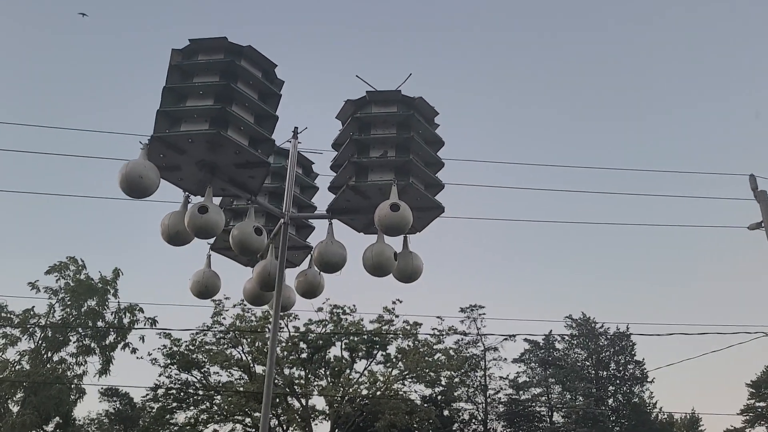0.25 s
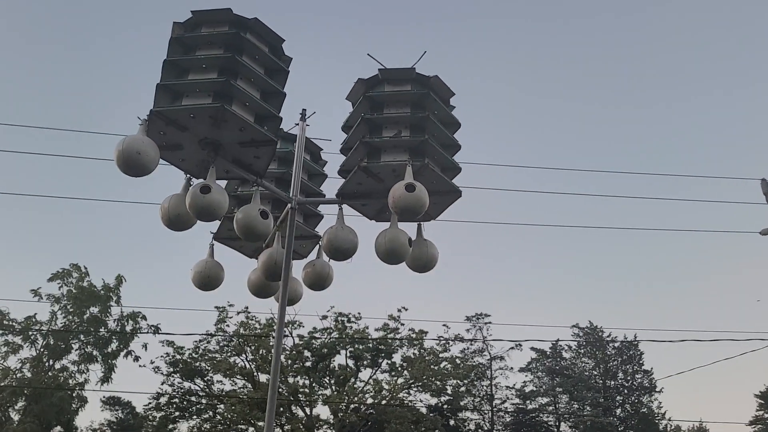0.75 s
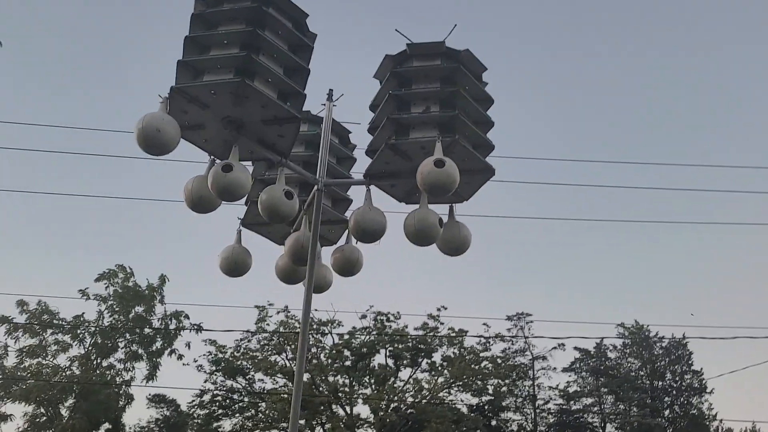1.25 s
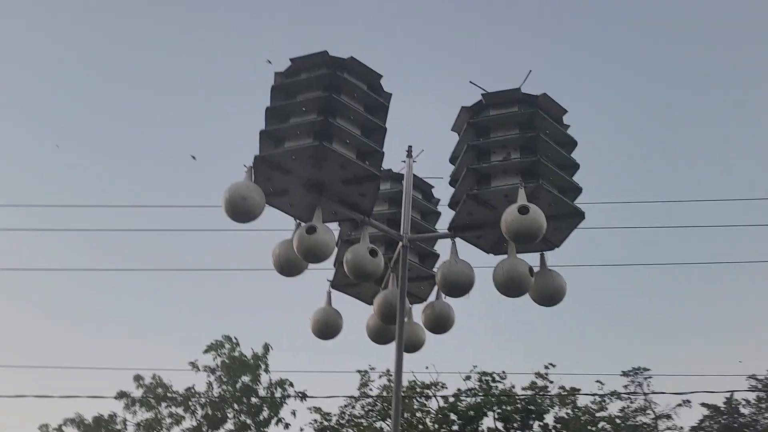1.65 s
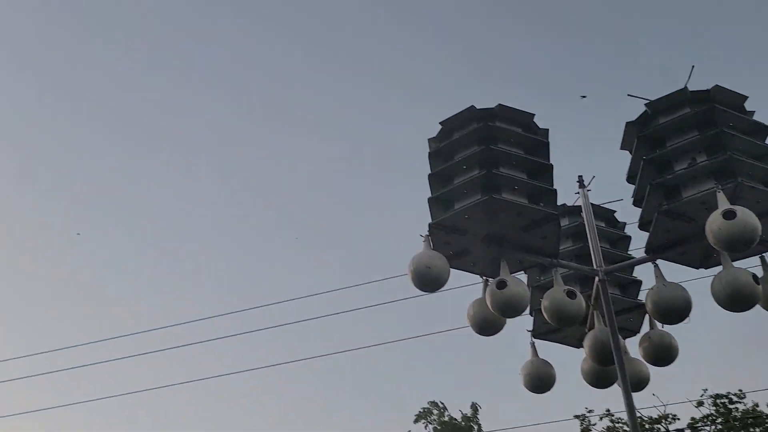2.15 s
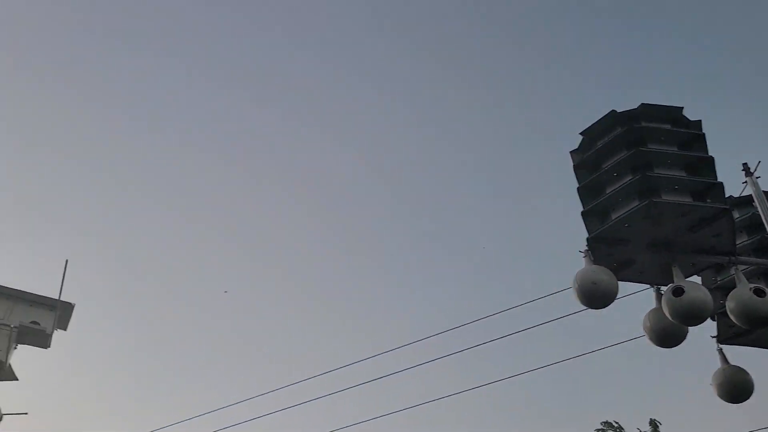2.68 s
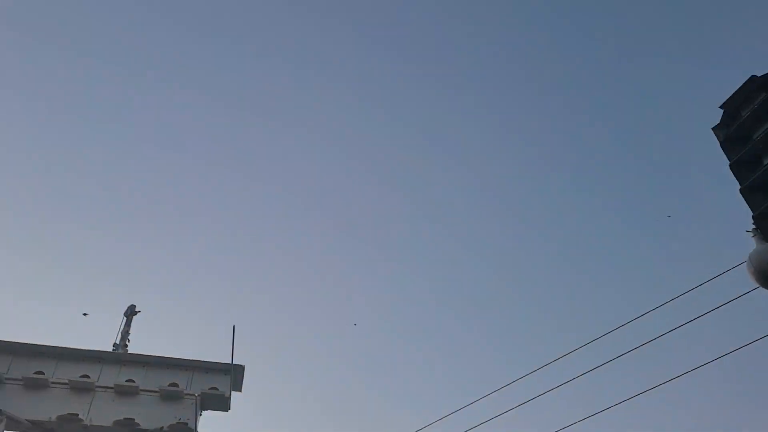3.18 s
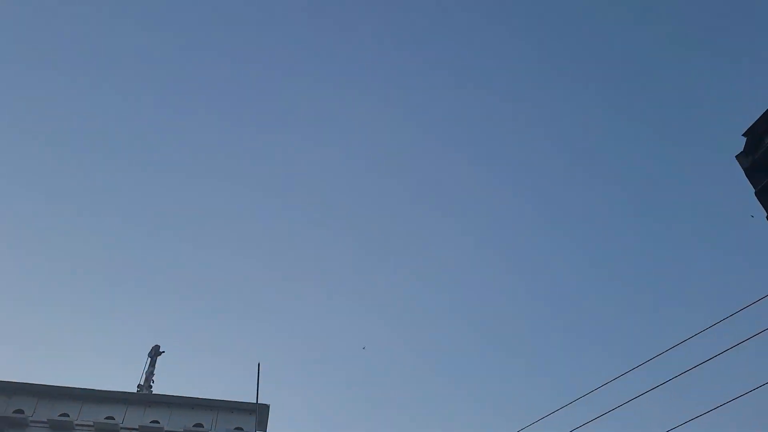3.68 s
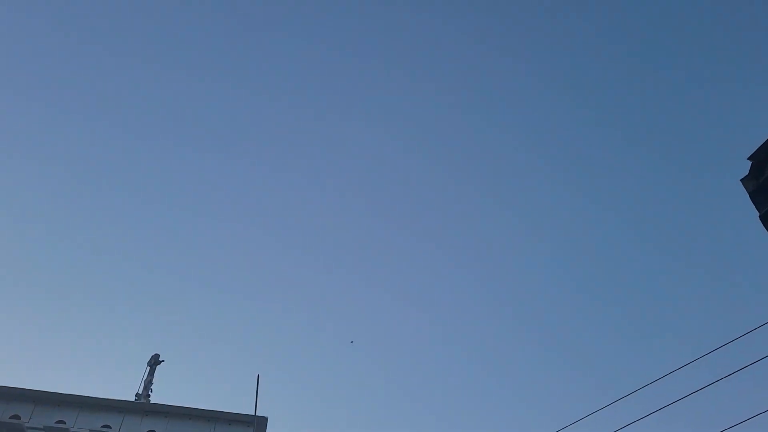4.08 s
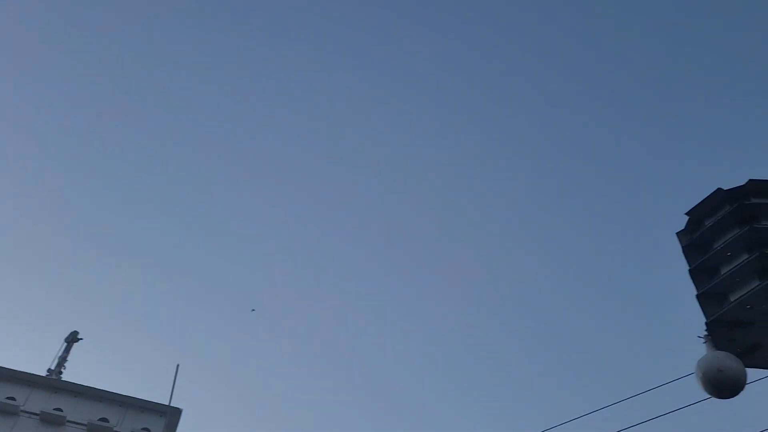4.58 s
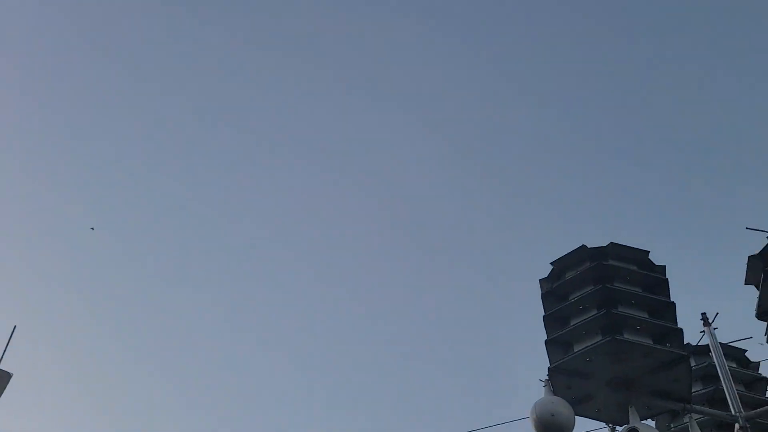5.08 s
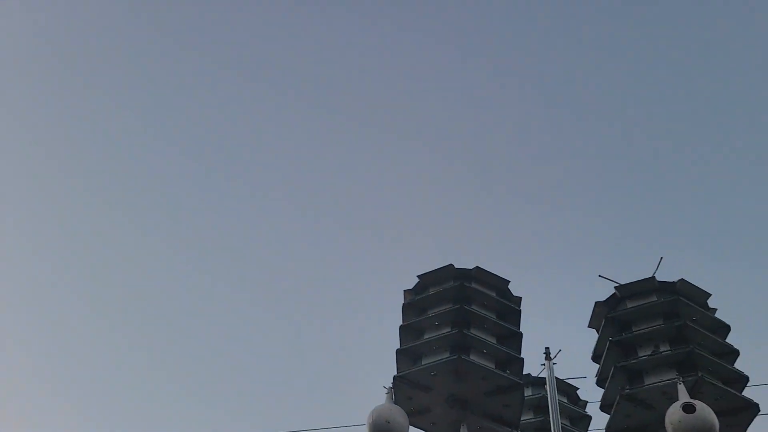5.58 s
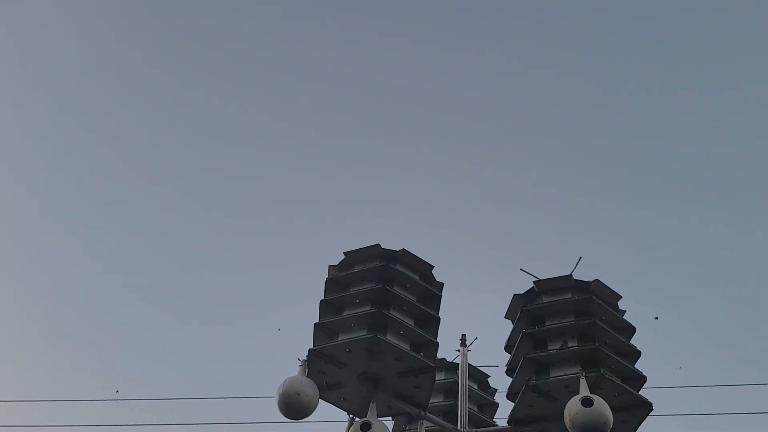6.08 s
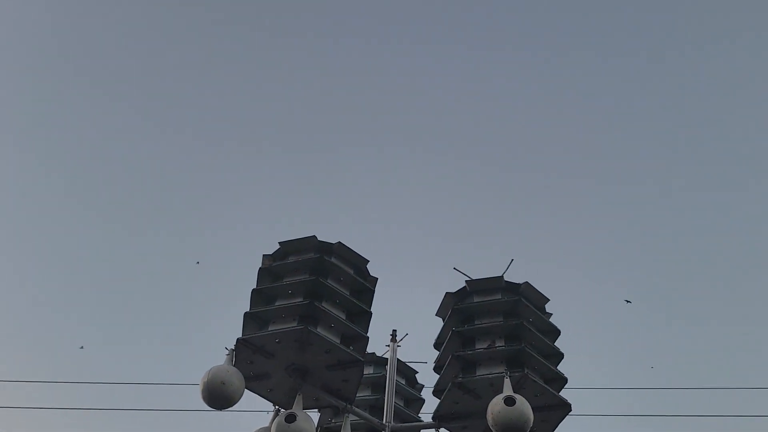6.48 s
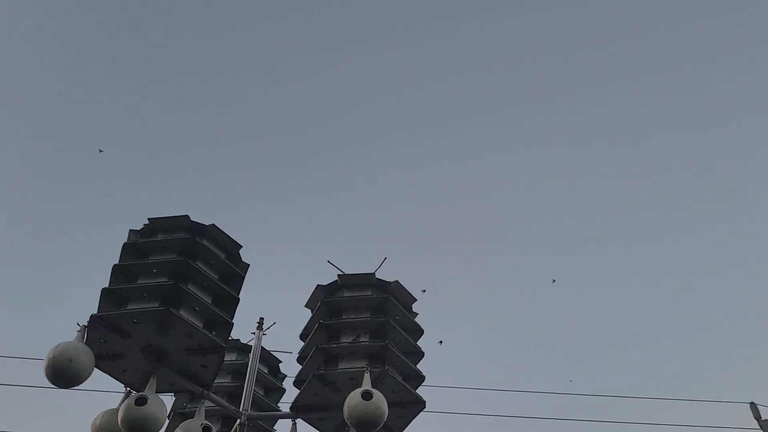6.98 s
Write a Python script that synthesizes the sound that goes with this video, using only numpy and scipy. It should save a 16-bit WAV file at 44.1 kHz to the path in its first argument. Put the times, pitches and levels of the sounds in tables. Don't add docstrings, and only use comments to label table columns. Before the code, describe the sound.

Martins wheel around outdoor nest houses, giving buzzy falling calls and clean tiny chirps, with quiet road noise, brief hum and a few handling creaks.

```python
import sys
import numpy as np
from scipy import signal
from scipy.fft import rfft, irfft, next_fast_len
from scipy.io import wavfile
from scipy.ndimage import uniform_filter1d, map_coordinates

SR = 44100
rng = np.random.default_rng(int(sys.argv[2]) if len(sys.argv) > 2 else 0)


def invert_db(x):
    u = np.asarray(x, float) / 20
    return 10 ** u


def transcribe(u):
    v = np.clip(np.atleast_2d(u).T, -1, 1)
    q = np.round(v * 32767).astype(np.int16)
    wavfile.write(sys.argv[1], SR, q)


N = 319725
T_S = np.arange(N) / SR

# frequency in Hz, density in dB per Hz.
WIND_SPECTRUM = [(15, -22), (30, -19), (55, -4), (90, -9), (160, -23), (400, -40.5), (800, -120)]
# time in seconds, level in dB.
GUSTS = [(0.0, -53.5), (.6, -62.5), (1.23, -63), (1.8, -56), (2.4, -58.5), (3.0, -54), (3.6, -61),
         (4.1, -59), (4.6, -56), (5.2, -55), (5.9, -54.5), (6.64, -57.5), (7.25, -69.5)]
# centre in seconds, half length in seconds, rise in dB.
BUMPS = [
    (0.378, 0.047, 11.5),
    (2.482, 0.043, 11),
    (3.544, 0.11, 10),
    (4.594, 0.051, 11.5),
    (5.454, 0.16, 10.5),
    (5.676, 0.022, 15.5),
    (6.743, 0.055, 8.5),
]
# frequency in Hz, density in dB per Hz.
ROAD_SPECTRUM = [(40, -14), (100, -6.5), (250, -8), (500, -14.5), (900, -18), (1500, -25.5), (3000, -56)]
# time in seconds, road level in dB.
TRAFFIC = [(0, -59), (.12, -61), (.5, -65), (1.2, -64), (2.05, -65), (2.4, -64), (2.8, -63.5), (3.5, -70),
           (3.95, -67), (4.3, -66), (4.7, -70.5), (5.3, -70), (5.8, -75), (6.4, -71), (6.78, -68),
           (6.9, -77.5), (7.08, -86.5), (7.25, -85)]
# frequency in Hz, density in dB per Hz.
TYRE_SPECTRUM = [(500, -26), (900, -11), (1200, -3.5), (1600, -5), (2100, -9), (3100, -4), (3900, -22),
                 (8000, -36), (16000, -50)]
TYRES_DB, TYRES_GROW, ROAD_MEAN_DB = -66.5, 1.13, -64
# frequency in Hz, density in dB per Hz.
CAR_SPECTRUM = [(80, 1), (250, 6), (600, -9), (1200, -3), (1900, -9), (2400, -41.5), (4000, -66.5)]
CAR_S, CAR_RISE_S, CAR_DB = 7.09, 0.08, -61.5
# frequency in Hz, density in dB per Hz.
INSECT_SPECTRUM = [(4900, -84), (5350, -13), (5800, -6.5), (6200, -12), (6800, -25.5)]
INSECT_DB = -79
# time in seconds, second harmonic in dB, fourth harmonic in dB.
HUM = [(0.0, -48, -53.5), (0.56, -65.5, -64.5), (7.25, -70, -69.5)]
# frequency in Hz, left-right likeness from 0 to 1.
ALIKE = [(60, .35), (130, .85), (300, .85), (600, .5), (3000, .4), (15000, .3)]
# time in seconds, peak in dB, crack in dB re peak, left-right difference in dB.
CREAKS = [
    (1.159, -49, -30, 1.5),
    (2.233, -44, -30, -1),
    (2.798, -50, -35, 3),
    (4.202, -49, -8, .5),
    (4.375, -38, -16, -11),
    (4.391, -50, -24, -11),
    (4.417, -52, -30, -10),
    (7.215, -58, -20, 0),
]
# start in seconds, length in seconds, level in dB, centre in Hz.
RUBS = [
    (-.02, 0.06, -63.5, 15130),
    (4.36, 0.064, -58.5, 7700),
    (4.754, 0.067, -69.5, 7600),
]
# centre in Hz, width in Hz, gain in dB.
CASE = [(294, 400, 12.5), (630, 73, 16), (1070, 190, 15)]
# frequency in Hz, decay by 60 dB in seconds.
TREE_DECAY = [(1000, 0.18), (3000, 0.63), (6000, 0.53), (15000, 0.52)]
# start in seconds, length in seconds, start in Hz, end in Hz, level in dB.
CHIRPS_AHEAD = [(.162, .033, 3600, 2950, -53), (.34, .035, 3350, 2000, -54), (.372, .07, 2000, 1800, -61),
                (.352, .034, 5600, 3600, -66), (.405, .03, 4300, 3600, -75), (1.17, .025, 4000, 3400, -63),
                (.39, .03, 3550, 2950, -58), (.852, .035, 3650, 2850, -50), (.885, .022, 3400, 3000, -53),
                (.985, .032, 4150, 3400, -59), (1.02, .035, 2600, 2100, -61),
                (1.082, .032, 3700, 3000, -50), (1.13, .015, 4400, 4000, -62),
                (1.515, .035, 3600, 2900, -49), (1.55, .025, 3400, 2800, -50), (1.89, .19, 6600, 6150, -69),
                (2.08, .03, 4900, 3800, -64), (3.76, .015, 3700, 3500, -63), (6.315, .04, 4300, 3000, -69),
                (6.44, .03, 6300, 4200, -65), (6.44, .04, 2500, 1900, -68), (1.435, .025, 3300, 2900, -57),
                (2.9, .06, 2600, 2450, -59), (6.75, .035, 5500, 5150, -63)]
# start in seconds, length in seconds, start in Hz, end in Hz, level in dB.
CHIRPS_LEFT = [(.2, .03, 3350, 2750, -56), (.23, .02, 3300, 2800, -63), (.92, .03, 2750, 2400, -63),
               (1.022, .03, 4800, 3200, -59), (1.045, .035, 3200, 2550, -58),
               (1.108, .033, 2900, 1900, -57), (1.14, .025, 2900, 2500, -57), (1.7, .015, 3650, 3500, -51),
               (2.11, .055, 4750, 3750, -64), (2.165, .125, 3750, 4750, -64)]
AHEAD_PAN_DB, LEFT_PAN_DB = 1.2, 7.5
# start in seconds, length in seconds, start in Hz, end in Hz, level in dB.
UNDERTONES = [(1.17, 0.082, 2500, 2460, -56), (1.694, 0.19, 2400, 2170, -59.5),
              (1.928, .11, 2320, 2194, -57), (2.372, 0.082, 2320, 2340, -64),
              (2.736, 0.12, 2310, 2150, -53.5), (3.04, 0.086, 2200, 2250, -59.5),
              (3.113, .11, 5440, 5180, -68.5), (3.042, 0.13, 4240, 4090, -68.5),
              (2.06, 0.089, 8100, 7530, -71.5), (6.724, 0.071, 5650, 4870, -64.5),
              (2.3, 0.074, 3050, 3160, -68), (4.1, 0.12, 2460, 2060, -62), (4.333, 0.092, 2260, 2100, -60),
              (5.498, 0.033, 7600, 7900, -64.5), (5.824, 0.12, 2850, 2350, -58),
              (5.864, 0.054, 7800, 8000, -63), (5.871, 0.055, 1570, 1630, -75),
              (6.47, .12, 2210, 1953, -58), (6.637, 0.12, 2310, 2070, -59.5),
              (6.76, 0.067, 1160, 1364, -66.5)]
FUZZ_HZ, UNDERTONE_PAN_DB = 455.6, 8

# start in seconds, length in seconds, peak in dB, top pitch in Hz, end pitch in Hz.
CLEAR = [
    (1.567, 0.15, -50.5, 3080, 2556),
    (3.784, 0.19, -46, 3293, 2550),
    (4.455, 0.18, -40.5, 3310, 2630),
    (4.858, 0.215, -37, 3379, 2697),
    (5.18, 0.21, -37.5, 3348, 2554),
]
BURRY = [
    (1.412, 0.08, -57.5, 3120, 2910),
    (2.15, 0.11, -36, 3224, 2830),
    (2.627, 0.15, -53.5, 3247, 3230),
    (3.36, 0.19, -44, 3307, 2873),
    (6.068, 0.13, -51.5, 3125, 2050),
    (5.405, 0.05, -61.5, 3130, 3120),
]
HOARSE_RIGHT = [
    (1.698, 0.2, -45, 3330, 2535),
    (2.02, 0.16, -45, 3254, 2430),
    (2.365, .225, -40, 3455, 2200),
    (3.002, 0.28, -37.5, 3450, 2422),
    (4.28, 0.165, -40, 3313, 2512),
]
HOARSE_LEFT = [
    (.688, 0.155, -38.5, 3270, 2080),
    (1.862, .16, -41, 3256, 2400),
    (4.063, .1, -43, 3490, 3000),
    (5.776, 0.175, -38, 3500, 2450),
]
SLURS = [
    (1.178, .205, -41, 3580, 2400),
    (2.268, 0.068, -50, 3150, 2750),
    (5.908, .175, -35, 3290, 2520),
]
RASPY = [
    (-.03, 0.08, -56.5, 3264, 2680),
    (-.03, 0.072, -52, 2438, 2140),
]
NEAR = [
    (6.355, 0.125, -50, 3240, 2780),
]
ROUGH = [
    (6.465, .15, -43.5, 3090, 2607),
]
LEVEL = [
    (4.133, 0.18, -40.5, 3230, 2630),
    (5.499, .215, -38, 3293, 2583),
]
STEEP = [
    (2.733, .165, -38, 3397, 2247),
]
DENSE = [
    (.485, .125, -46, 3380, 2700),
    (.555, .115, -45, 3480, 2200),
]
HARSH = [
    (6.612, .215, -38, 3270, 2400),
]
THICK = [
    (3.521, .175, -38, 3357, 2497),
]
FLOCK = (CLEAR, BURRY, HOARSE_RIGHT, HOARSE_LEFT, SLURS, RASPY, NEAR, ROUGH, LEVEL, STEEP, DENSE, HARSH, THICK)
# burr rate in Hz, pitch swing as share of pitch, rasp in dB.
VOICES = [(180, .021, -29), (180, .025, -24), (115, .032, -17), (135, .03, -21), (150, .027, -21),
          (198, .035, -8), (194, .024, -22), (170, .03, -13), (180, .022, -25), (170, .024, -22),
          (150, .033, -13), (194, .026, -15), (130, .035, -11)]
# second, third, fourth and fifth partial in dB, spray in dB, breath in dB.
OVERTONES = [(-23.5, -34.5, -34, -41, -32, -37), (-25, -36, -48.5, -33.5, -28.5, -39),
             (-25, -31, -47.5, -42.5, -20.5, -35.5), (-21.5, -33.5, -61, -38.5, -26, -36.5),
             (-25.5, -43, -33.5, -41.5, -23.5, -34.5), (-16, -22, -30, -18, 0, -25),
             (-13.5, -41, -47, -40, -21, -31), (-15.5, -41, -39, -26.5, -14.5, -30),
             (-21, -35, -32.5, -43.5, -29.5, -37), (-24, -40, -51, -43, -18.5, -32.5),
             (-23.5, -31, -44, -40, -18.5, -35), (-13, -46, -36.5, -36, -15.5, -28.5),
             (-18.5, -41, -45, -32, -18.5, -31)]
# share of the call at top pitch, rise to it as share of pitch, power of the pitch fall,
# share of the call at peak level, swell in dB, dying in dB.
ARCHES = [(.33, 0.099, 1.8, 0.62, 10.5, 5), (.3, .07, 1.6, 0.56, 6.5, 0), (.25, 0.06, 1.35, 0.49, 12, 9.5),
          (0.25, 0.068, 1.6, 0.45, 15.5, 18), (0.17, .03, 1.2, 0.22, 9.5, 11),
          (0.11, 0.01, 1.1, 0.18, -10.5, 33), (.45, 0.17, 1.2, 0.71, 11.5, -1.5),
          (0.33, 0.039, 1, 0.46, 9, 8), (.3, 0.068, 2.1, 0.73, 6.5, 6.5), (.25, 0.058, 1.25, 0.41, 12, 7.5),
          (0.17, .02, 1.3, 0.54, 6.5, 9.5), (0.45, 0.23, 0.86, 0.7, 10.5, 8.5),
          (.25, .04, 1.9, 0.42, 7.5, 15.5)]
# time in seconds, left-right difference in dB, left lag in ms.
PATHS = [
    [(1.6, 4.5, -0.37), (3.8, 8, -.45), (4.46, 9.5, -.4), (4.85, 11.5, -0.41), (5.18, 11.5, -0.33)],
    [(1.4, 8, -0.34), (2.15, 7, 0.29), (2.63, 0, 0.06), (3.36, 5.5, -0.41), (5.4, -2, -0.43),
     (6.07, -3, -0.12)],
    [(1.7, 0, 0.32), (2.02, 7, .2), (2.36, 5, .16), (3.0, 4, .14), (4.3, 10, 0.54)],
    [(.7, 8.5, -0.09), (1.9, 7.5, -.3), (4.1, 9, -0.54), (5.8, 5, -0.39)],
    [(1.2, -3, 0.39), (2.3, 11, -0.35), (5.9, 6.5, -0.39)],
    [(0.0, 0, -.05)],
    [(6.36, 7, -0.05)],
    [(6.47, 9.5, -.6)],
    [(4.15, 3.5, -.43), (5.5, 6.5, -.4)],
    [(2.74, 3, .05)],
    [(.49, 8.5, .43), (.55, 0, .45)],
    [(6.62, 3, -0.26)],
    [(3.5, -1, -.4)],
]
# multiple of pitch, spread in Hz, level in dB.
SIDEBANDS = [(0.72, 600, -9), (.9, 900, 5.5)]
# frequency in Hz, gain in dB.
THROAT = [(1200, -14), (2100, -2), (3000, 0.5), (3650, 2), (4050, -3), (5000, -4), (6300, -3), (16000, 3)]
SWELL_BEND = 1.74
LOW_FADE_DB, FOURTH_LATE_DB = 13, 20
SPRAY_MULTIPLE, SPRAY_HZ = 1.2, 2200
ATTACK_S, RELEASE_S, FLUTTER_DB = .016, .016, 1.2
TOP_HZ = 15780


def unit(x):
    return x / np.sqrt(np.mean(x ** 2) + 1e-20)


def along(points, hz):
    f, v = np.transpose(points)
    return np.interp(np.log(hz + 1), np.log(f + 1), v)


def curves(rows, t):
    s, *cols = np.transpose(rows)
    return [np.interp(t, s, c) for c in cols]


def wobble(rate_hz, size=N):
    knots = rng.standard_normal(int(size * rate_hz / SR) + 4)
    return map_coordinates(knots, [np.arange(size) * rate_hz / SR])


def filtered(x, response):
    m = next_fast_len(N + SR // 2)
    return irfft(rfft(x, m) * response(np.fft.rfftfreq(m, 1 / SR)), m)[..., :N]


def fade(t, rise_s, fall_s):
    return np.clip((t - t[0]) / rise_s, 0, 1) * np.clip((t[-1] - t) / fall_s, 0, 1)


def sine(hz):
    return np.sin(2 * np.pi * np.cumsum(hz) / SR)


def add(out, x, s, pan_db, lag_ms):
    for port, sign in enumerate((1, -1)):
        at = max(round((s + sign * lag_ms / 2000) * SR), 0)
        out[port, at:at + len(x)] += invert_db(sign * pan_db / 2) * x


def rush(spectrum, patchy_db):
    z = signal.stft(rng.standard_normal((2, N)), nperseg=512)[2]
    field = uniform_filter1d(rng.standard_normal(z.shape[1:]), 6, 0)
    field = uniform_filter1d(field, 14, 1)
    pair = signal.istft(z * invert_db(patchy_db * unit(field)), nperseg=512)[1][:, :N]

    def mid_side(hz):
        turn = np.arccos(np.clip(along(ALIKE, hz), -1, 1)) / 2
        return invert_db(along(spectrum, hz)) * [np.cos(turn), np.sin(turn)]

    mid, side = filtered(pair, mid_side)
    return unit(np.array([np.roll(mid + side, -17), mid - side]))


def road():
    level_db, = curves(TRAFFIC, T_S)
    level_db = level_db + 6 + 2 * wobble(8.3)
    return invert_db(level_db + [[-.8], [.8]]) * rush(ROAD_SPECTRUM, patchy_db=1.5)


def tyres():
    road_db, = curves(TRAFFIC, T_S)
    level_db = TYRES_DB + TYRES_GROW * (road_db - ROAD_MEAN_DB)
    return invert_db(level_db + 6 + 2.05 * wobble(12)) * rush(TYRE_SPECTRUM, patchy_db=1.8)


def car():
    return invert_db(CAR_DB) * np.clip((T_S - CAR_S) / CAR_RISE_S, 0, 1) * rush(CAR_SPECTRUM, patchy_db=0)


def insects():
    level_db = INSECT_DB + 1.5 * wobble(3) + 1.2 * wobble(30)
    return invert_db(level_db) * rush(INSECT_SPECTRUM, patchy_db=2)


def hum():
    second_db, fourth_db = curves(HUM, T_S)
    mains = 2 * np.pi * 119.8 * T_S
    second = invert_db(second_db + 2.8 * wobble(8.6)) * np.sin(mains + 1.7 * wobble(7.4))
    fourth = invert_db(fourth_db - 2.5 + 4.6 * wobble(12)) * np.sin(2 * mains + 2.63 * wobble(11))
    return second + fourth


def wind():
    level_db, = curves(GUSTS, T_S)
    for s, half_s, rise_db in BUMPS:
        level_db = level_db + rise_db * np.exp(-((T_S - s) / half_s) ** 2)
    lumps = unit(invert_db(2.5 * wobble(6)) * rush(WIND_SPECTRUM, patchy_db=1.5))
    return invert_db(level_db + [[-3], [3]]) * lumps


def case(hz):
    response = 0
    for k, (centre_hz, width_hz, db) in enumerate(CASE):
        damping = 1j * hz * width_hz
        response = response + (-1) ** k * invert_db(db - 29) * damping / (centre_hz ** 2 - hz ** 2 + damping)
    return response


def creaks():
    knocks, cracks = np.zeros((2, N + SR)), np.zeros((2, N + SR))
    t = np.arange(SR // 50) / SR
    for s, db, crack_db, pan_db in CREAKS:
        knock = np.sin(np.pi * np.clip(t / 0.00075, 0, 1))
        add(knocks, invert_db(db + 26) * knock, s, pan_db, .3)
        crack = np.diff(rng.standard_normal(len(t) + 1))
        add(cracks, invert_db(db + crack_db - 60 * t / .012) * crack, s, pan_db, 0)
    return cracks[:, :N] + filtered(knocks[:, :N], case)


def rubs():
    out = np.zeros((2, N))
    for s, length_s, db, hz in RUBS:
        half_s = length_s / 2
        stroke = np.exp(-((T_S - s - half_s) / half_s) ** 4) * invert_db(3 * wobble(200))
        spectrum = [(hz / 3, -18), (hz * .85, -4), (hz, 0), (hz * 1.2, -6), (hz * 2, -12)]
        out += invert_db(db) * stroke * rush(spectrum, patchy_db=2)
    return out


def yard(x):
    t = np.arange(SR // 8) / SR
    near = rng.standard_normal((2, len(t))) * invert_db(-60 * t / .07) * (t > .002)
    near = invert_db(-4.5) * near / np.linalg.norm(near[0])
    hz, t, z = signal.stft(rng.standard_normal((2, SR)), SR, nperseg=256)
    decay = invert_db(-60 * t / along(TREE_DECAY, hz)[:, None])
    tail = signal.istft(z * decay, SR, nperseg=256)[1]
    far = invert_db(-17) * np.pad(tail / np.linalg.norm(tail[0]), ((0, 0), (1200, 0)))
    around = x.mean(axis=0) + x / 2
    scatter = signal.fftconvolve(around, near, axes=1)[:, :N]
    return x + scatter + signal.fftconvolve(around, far, axes=1)[:, :N]


def chirps():
    out = np.zeros((2, N + SR))
    for rows, pan_db in ((CHIRPS_AHEAD, AHEAD_PAN_DB), (CHIRPS_LEFT, LEFT_PAN_DB)):
        for s, length_s, start_hz, end_hz, db in rows:
            t = np.arange(0, length_s + .003, 1 / SR)
            hz = start_hz + (end_hz - start_hz) * (t / length_s) ** .9 + 25 * wobble(200, len(t))
            slide = sine(hz) * invert_db(2 * wobble(120, len(t)))
            add(out, invert_db(db) * fade(t, .006, .011) * slide, s, pan_db, -.04 * pan_db)
    return out[:, :N]


def undertones():
    out = np.zeros((2, N + SR))
    for s, length_s, start_hz, end_hz, db in UNDERTONES:
        t = np.arange(0, length_s, 1 / SR)
        note = wobble(FUZZ_HZ, len(t)) * sine(np.linspace(start_hz, end_hz, len(t)))
        add(out, invert_db(db + 4) * fade(t, .015, .015) * note, s, UNDERTONE_PAN_DB, .2)
    return out[:, :N]


def arch(u, top, before, after, bend):
    early = np.clip(1 - u / top, 0, 1) ** 2
    late = np.clip((u - top) / (1 - top), 0, 1) ** bend
    return -before * early - after * late


def call(out, row, voice, upper, shape, path):
    s, length_s, peak_db, top_hz, end_hz = row
    burr_hz, swing, rasp_db = voice
    second_db, third_db, fourth_db, fifth_db, spray_db, breath_db = upper
    top, rise, sag_bend, peak, swell_db, dying_db = shape
    t = np.arange(s + 0.00085, s + length_s + 0.00557, 1 / SR)

    def chance(rate_hz):
        return wobble(rate_hz, len(t))

    strain = np.linspace(0, 1, len(t))
    hz = top_hz + arch(strain, top, rise * top_hz, top_hz - end_hz, sag_bend)
    hz = uniform_filter1d(hz, 600)
    level_db = peak_db + arch(strain, peak, swell_db, dying_db, SWELL_BEND)

    burr = 2 * np.pi * np.cumsum(burr_hz * (1 + .22 * chance(60))) / SR
    depth = np.clip(60 * swing - 1, .15, .75)
    pulses = (1 + depth * np.cos(burr)) / np.sqrt(1 + depth ** 2 / 2)
    pulses = pulses * invert_db(FLUTTER_DB * chance(35.5))
    bend = swing * (.75 + .55 * strain) * (1.1 * np.sin(burr) + 22 * swing * chance(400))
    phase = 2 * np.pi * np.cumsum(hz * (1 + bend)) / SR

    tone = np.sin(phase)
    partials_db = (second_db - LOW_FADE_DB * strain, third_db - LOW_FADE_DB * strain,
                   fourth_db - FOURTH_LATE_DB * (1 - strain) ** 4, fifth_db)
    for k, db in enumerate(partials_db, 2):
        partial = np.sin(k * phase + (.06 * k + strain) * chance(900))
        tone = tone + invert_db(db + 3 * chance(60)) * (k * hz < 17000) * partial
    tone = pulses * tone
    for multiple, spread_hz, db in SIDEBANDS:
        rasp = invert_db(rasp_db + db + 1.5 * strain + 2.5 * chance(12.6))
        tone = tone + rasp * chance(spread_hz) * np.sin(multiple * phase)
    tone = tone + invert_db(spray_db) * chance(SPRAY_HZ) * np.sin(SPRAY_MULTIPLE * phase)
    breath = 1.4 * invert_db(breath_db + 4 * strain) * uniform_filter1d(rng.standard_normal(len(t)), size=2)
    envelope = invert_db(level_db + 2) * fade(t, ATTACK_S, RELEASE_S)
    add(out, envelope * (tone + breath), t[0], *curves(path, s))


def calls():
    out = np.zeros((2, N + SR))
    for rows, *bird in zip(FLOCK, VOICES, OVERTONES, ARCHES, PATHS):
        for row in rows:
            call(out, row, *bird)
    return filtered(out[:, :N], lambda hz: invert_db(along(THROAT, hz)))


def scene():
    background = road() + tyres() + car() + insects() + hum() + wind()
    hand = creaks() + rubs()
    birds = chirps() + undertones() + calls()
    return background + hand + yard(birds)


def band_limit(x):
    return signal.sosfilt(signal.butter(12, 16820, fs=SR, output="sos"), x)


def record(dry):
    mix = filtered(dry, lambda hz: hz < TOP_HZ)
    return band_limit(mix)


dry = scene()
out = record(dry)
transcribe(out)
```